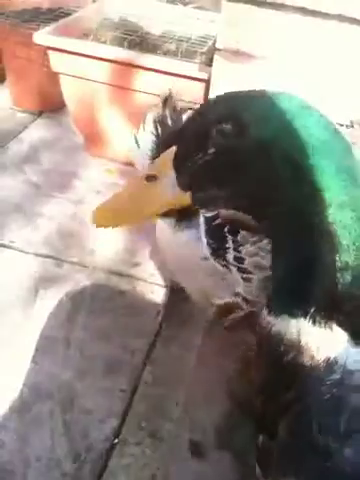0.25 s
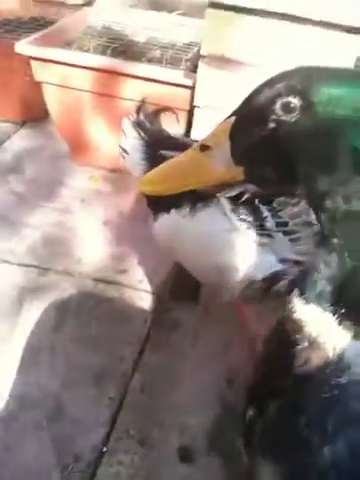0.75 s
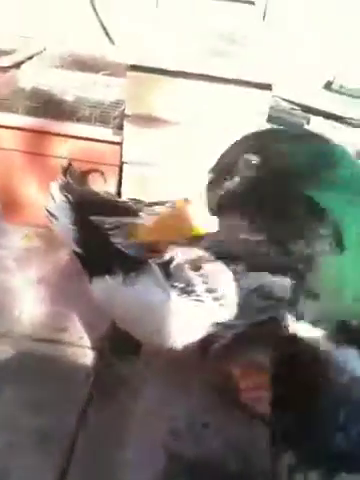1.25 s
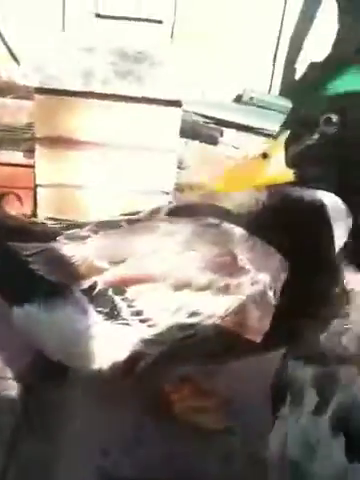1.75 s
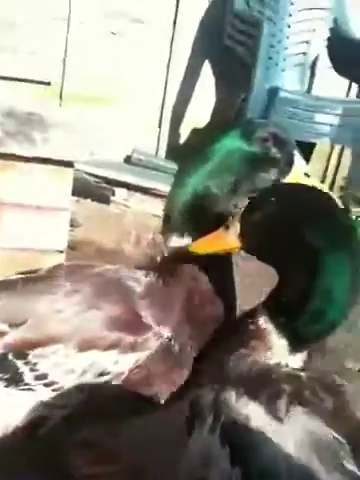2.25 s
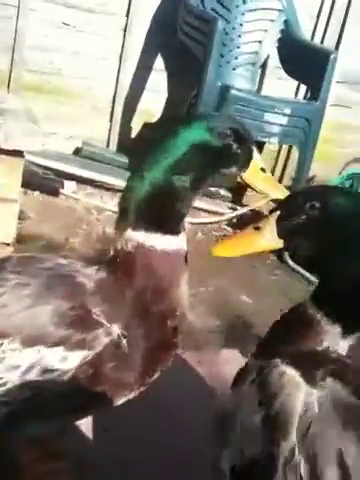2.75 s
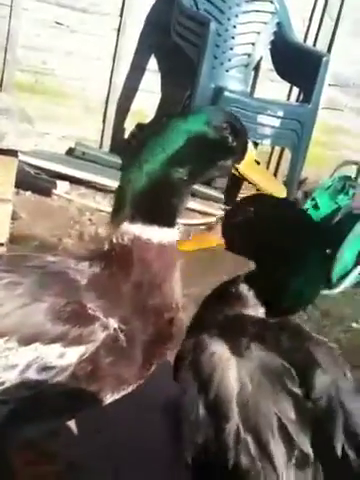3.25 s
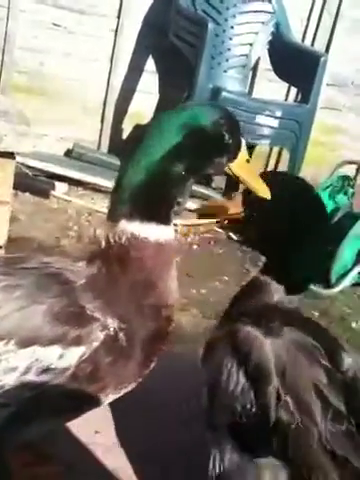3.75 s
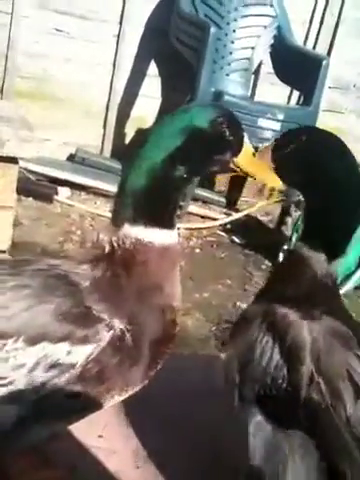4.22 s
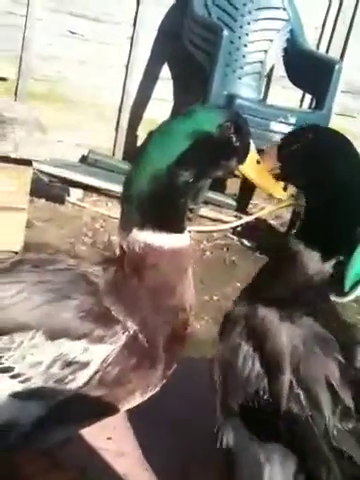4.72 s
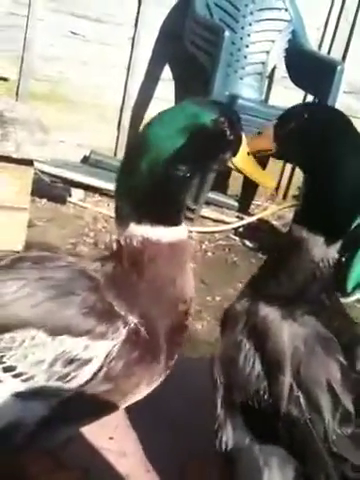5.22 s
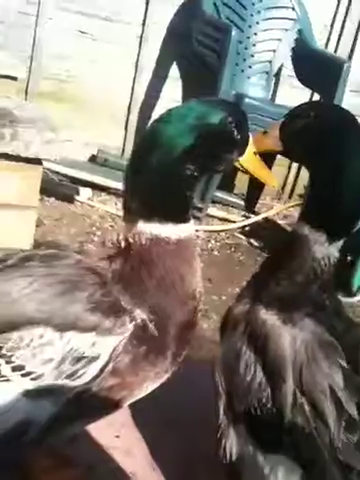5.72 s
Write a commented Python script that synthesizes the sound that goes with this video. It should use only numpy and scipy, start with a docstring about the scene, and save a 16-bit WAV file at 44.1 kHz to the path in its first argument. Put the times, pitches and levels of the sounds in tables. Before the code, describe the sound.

In a small walled yard, drakes chatter right beside the microphone for six seconds. The calls start at once, about 0.1 s, and never stop: some thirty-four short quacks, each around a tenth of a second, spaced about 0.2 s apart with some overlapping pairs. Each starts with a hollow little cluck, then swells into a hoarse, fast-fluttering reedy buzz around 1.3 kHz; stronger ones add a whistle near 2 kHz and breathy hiss. Stronger whistling calls stand out near 0.1, 1.5, 2.0, 2.6, 4.8 and 5.0 s; duller, weaker ones sit between, as around 0.6 to 0.7 s. Soft feather brushing comes near 0.3 and 2.7 s, a small scrape at 1.1 s, and dull foot bumps from 0.8 to 1.5 and 2.8 to 3.4 s. Short dense echoes follow everything. Beneath lies a very quiet outdoor hush with a faint thin whine. The last quack is cut near the end.

```python
"""Over a quiet outdoor hush with a thin whine, drakes chatter close by in a small walled yard for six seconds.
Each short quack opens with a cluck of decaying tones, then swells and beats 60 to 90 times a second. A beat is a low
reedy note, roughened by noise, with a higher whistle and a hiss that grow under hard pressure; some quacks overlap.
Brushing feathers and feet (enveloped noise) and dull bumps (sinking sines) come between; the yard adds dense echoes."""
import sys
import numpy as np
from scipy import signal
from scipy.fft import rfft, irfft
from scipy.io import wavfile
from scipy.ndimage import uniform_filter1d

SR = 44100
rng = np.random.default_rng(int(sys.argv[2]) if len(sys.argv) > 2 else 0)


def transcribe(signal):
    """Save signal, clipped to [-1, 1], as a 16-bit WAV file at the path in sys.argv[1]."""
    frames = np.atleast_2d(signal).T
    limited = np.clip(frames, -1, 1)
    pcm = np.round(limited * 32767).astype(np.int16)
    wavfile.write(sys.argv[1], SR, pcm)


N = 263718  # samples in the scene


def amp(db):
    """Decibel law: 20 dB is a factor of ten in amplitude."""
    return 10 ** (np.asarray(db) / 20)


def evened(x):
    """Normalization by effective value: the rms becomes 1."""
    return x / np.sqrt(np.mean(x ** 2) + 1e-20)


def read(points, hz):
    """Interpolation of a spectrum table on a logarithmic frequency axis."""
    f, value = np.transpose(points)
    return np.interp(np.log(hz + 1), np.log(f + 1), value)


def add(mix, s, sound):
    """Superposition: adds a sound at time s, dropping what falls outside."""
    start = round(s * SR)
    sound = sound[max(-start, 0):]
    part = mix[max(start, 0):][:len(sound)]
    part += sound[:len(part)]


def play(source, rows):
    """Superposition of one sound for each row on the time line."""
    mix = np.zeros(N)
    for row in rows:
        add(mix, *source(*row))
    return mix


def band(x, hz, width):
    """Simple resonance: a second-order peak with a gain of 1 at its centre."""
    hz = min(hz, SR / 2 - 1000)
    return signal.lfilter(*signal.iirpeak(hz, hz / width, SR), x)


def through(x, modes):
    """Parallel resonances, each applied twice so that the valleys between them stay dark."""
    total = 0
    for hz, width, db in modes:
        wide = width * np.pi / 2  # the cascaded pair narrows again to about the given width
        total = total + amp(db) * band(band(x, hz, wide), hz, wide)
    return total


def wander(size, hz):
    """Low-passed random fluctuation of rms 1; its Gaussian spectrum falls to 1/e in amplitude at hz."""
    f = np.fft.rfftfreq(size, 1 / SR)
    return evened(irfft(rfft(rng.standard_normal(size)) * np.exp(-(f / hz) ** 2), size))


def floor():
    """Stationary noise shaped in spectrum, with drifting patches, plus the electronics' phase-unsteady whine."""
    # outdoor hush, relative spectral density: f/Hz, level/dB
    hush_spectrum = [(25, -28), (50, -22), (75, -4), (160, 4.5), (400, 0), (650, -7.5), (1350, -8),
                     (2200, -12.5), (2900, -16.5), (6500, -17.5), (8700, -16), (13000, -20.5),
                     (15700, -21.5)]
    # whine of the electronics: f/Hz, rms level/dB
    whine_lines = [(7485, -90), (14970, -93), (15030, -93)]
    hush_db = -68  # rms level
    hz, _, z = signal.stft(rng.standard_normal(N), SR, nperseg=2048)
    patches = uniform_filter1d(rng.standard_normal(z.shape), size=8, axis=0)  # smooth over frequency
    patches = evened(uniform_filter1d(patches, size=6, axis=1))  # and over time
    patchy_db = 2.6 / (1 + hz[:, None] / 6000)
    gain_db = read(hush_spectrum, hz)[:, None] + patchy_db * patches
    hush = signal.istft(z * amp(gain_db), SR, nperseg=2048)[1][:N]
    t = np.arange(N) / SR
    whine = np.zeros(N)
    for f, db in whine_lines:
        whine += amp(db) * np.sqrt(2) * np.sin(2 * np.pi * f * t + wander(N, 60))
    return amp(hush_db) * evened(hush) + whine


def yard(x, gap=0.0068):
    """Reverberation: dense echoes from paving, walls and pots, each band decaying at its own rate."""
    # decay of the yard to -60 dB: f/Hz, t60/s
    decay_times = [(300, 0.49), (1100, 0.19), (1700, 0.23), (2250, 0.16), (5000, 0.23), (10000, 0.34)]
    size = 32768
    echoes_per_s = 2500
    taps = rng.choice([-1., 1.], size) * (rng.random(size) < echoes_per_s / SR)
    hz, t, z = signal.stft(taps, SR, nperseg=256)
    decay = amp(-60 * t / read(decay_times, hz)[:, None])
    tail = signal.istft(z * decay, SR, nperseg=256)[1]
    tail *= 1 - np.exp(-(np.arange(len(tail)) / SR / gap) ** 2)  # echoes build up over gap seconds
    return signal.fftconvolve(x, tail / np.linalg.norm(tail))[:N]


def brush(s, length, db, hz):
    """Friction noise: random grains through one broad resonance under a half-sine envelope."""
    size = 16384
    grains = rng.standard_normal(size) * amp(4 * wander(size, 200))
    u = np.minimum(np.arange(size) / (SR * length), 1)
    swish = evened(through(grains, [(hz, hz * 0.5, 0)]))
    return s, amp(db) * swish * np.sin(np.pi * u)


def bump(s, db, hz, length):
    """Damped vibration: a dull low note that swells quickly and sinks in pitch as it dies."""
    u = np.arange(0, 3, 1 / (SR * length))  # time in units of length
    shape = (u / 0.35) ** 2 * np.exp(2 * (1 - u / 0.25))
    turns = hz * length * u * (1.03 - 0.041 * u)
    return s, amp(db) * shape * np.sin(2 * np.pi * turns)


def cluck(s, db, hz, snap_db):
    """Cavity resonance excited as the bill parts: a hollow decaying pop with a short noise snap on top."""
    t = np.arange(2048) / SR
    pop = np.sin(2 * np.pi * hz * t) * amp(-60 * t / 0.033)
    pop += 1.23 * np.sin(2 * np.pi * hz * 0.713 * t) * amp(-60 * t / 0.0072)
    pop = signal.lfilter(*signal.butter(2, 260, "high", fs=SR), pop)  # a small mouth radiates no bass
    snap = band(rng.standard_normal(len(t)) * amp(-60 * t / 0.023), 2320, 1750)
    sound = pop / abs(pop).max() + amp(snap_db) * snap / abs(snap).max()
    return s, amp(db + 5.0) * signal.lfilter(*signal.butter(3, 4800, fs=SR), sound)


def quack(s, rate, swell, fade, reed_db, reed_hz, whistle_db, whistle_hz, hiss_db, tilt_db):
    """Source-filter principle: one push of air at s, chopped by the syrinx, excites throat and bill."""
    # resonances of the throat: f/Hz at a reed pitch of 1310 Hz, width/Hz, relative level/dB
    throat_modes = [(380, 120, -5), (826, 85, 4.5), (1159.5, 97, 7), (1358, 258, 9), (1709, 172, 9.5),
                    (2114, 267, 5.5), (2480, 57, -18)]
    # resonances of the bill: f/Hz, width/Hz, relative level/dB before the tilt
    bill_modes = [(3263, 148, 0.5), (3904, 190, -5.5), (4245, 210, -1.5), (4870, 305, -1.5),
                  (5095, 430, -3), (5800, 210, -28)]
    size = 8192
    t = (np.arange(size) - size // 2) / SR
    push_db = -8.5 * np.where(t < 0, np.abs(t / swell) ** 3.59, np.abs(t / fade) ** 2.0)
    push = amp(push_db)
    # the whistle needs pressure: it comes late and gives out early
    hard_push = amp(np.where(t < 0, -17 * (t / swell) ** 2, -26 * (t / fade) ** 2))
    # the beats slow down as the pressure drops
    slowing = np.where(t < 0, .08, .2) * (1 - push)
    turns = np.cumsum(rate * (1 - slowing)) / SR
    turns = turns - turns[size // 2] + .03 * wander(size, 40)
    uneven_db = 1.35 * wander(size, 84)

    def beats(lead, opening, leak):
        """Pulsed valve: snaps open lead cycles early, is widest after opening cycles, then closes slowly."""
        u = (turns + lead) % 1 / opening
        return amp(uneven_db) * (leak + u ** 2 * np.exp(2 * (1 - u)))

    def tone(hz, rough):
        """Phase integration: a membrane note, roughened in amplitude and phase by turbulent air."""
        angle = 2 * np.pi * np.cumsum(hz) / SR
        in_phase = np.sin(angle) * (1 + rough * wander(size, 830))
        return in_phase + rough * np.cos(angle) * wander(size, 720)

    def at_level(x, shape, db):
        """Energy scaling: gives x the rms of the envelope shape, times the gain db."""
        return amp(db) * evened(x) * np.sqrt(np.mean(shape ** 2))

    # the stronger the whistle, the earlier in each beat the reed note gives way to it
    breaking = 1 / (1 + amp(reed_db - whistle_db - 0.5))
    reed_beats = beats(0.26 + 0.3 * breaking, opening=.17, leak=.12)
    reed = tone(reed_hz * (1 + 0.1026 * wander(size, 234.5)), rough=0.53) * reed_beats
    rasp = 1.43 * rng.standard_normal(size) * reed_beats
    # the whistle's pitch arches with the pressure
    arch = whistle_hz * (.82 + .165 * push ** .5 + 0.0252 * wander(size, 174))
    chirp = 1 + 0.031 * np.sin(2 * np.pi * (turns + 0.14))  # each beat bends upward
    whistle_lead = 0.24  # cycles
    whistle = tone(arch * chirp, rough=.25)
    whistle *= beats(whistle_lead, opening=.18, leak=.04) * hard_push
    overtone = band(whistle ** 2, 2 * whistle_hz, 700)  # squaring doubles the frequency
    hiss = rng.standard_normal(size) * beats(whistle_lead, opening=.2, leak=.25)
    bill = [(hz, width, db + tilt_db * np.log2(hz / 4100)) for hz, width, db in bill_modes]
    # the throat resonances rise a little with the reed pitch
    throat = [(hz * (reed_hz / 1310) ** 0.25, width, db) for hz, width, db in throat_modes]
    voice = at_level(through((reed + rasp) * push, throat), push, reed_db)
    voice += at_level(through(whistle, throat), hard_push, whistle_db)
    voice += at_level(band(overtone, 2 * whistle_hz, 700), hard_push, whistle_db - 30)
    voice += at_level(through(hiss * (push + hard_push), bill), push, hiss_db)
    return s + t[0], amp(-3.0) * voice


def call(s, rise, fade, rate, cluck_db, reed_db, whistle_db, whistle_hz):
    """Nonlinear turbulence: a cluck, then a quack whose hiss grows faster than its voice."""
    # slow change of the voices: t/s, reed pitch f/Hz, hiss level/dB (at the reference voice level and
    # before the quack's common -3 dB), hiss tilt/(dB per octave)
    voice_changes = [(0, 1266, -69, -3), (0.499, 1198, -65.5, -2), (1.3, 1275, -61, 4),
                     (2.0, 1298, -68.5, 13), (2.7, 1298, -62, -9), (3.4, 1304, -64, -9),
                     (3.8, 1320, -58.5, -15), (4.3, 1344, -63.5, -9), (5.002, 1345, -63, -1),
                     (5.6, 1324, -58, -1), (6.0, 1322, -65, -5)]
    hiss_ref_db, hiss_growth = -39.5, 1.29  # reference voice level in dB; growth in dB per dB
    swell_share = .7  # swell time of the air as a part of the rise
    times, *curves = np.transpose(voice_changes)
    reed_hz, hiss_db, tilt_db = [np.interp(s, times, curve) for curve in curves]
    voice_db = 20 * np.log10(np.hypot(amp(reed_db), amp(whistle_db)))
    hiss_db = hiss_db + hiss_growth * (voice_db - hiss_ref_db)
    sound = np.zeros(SR // 2)
    add(sound, *cluck(0, cluck_db, hz=744, snap_db=-7))  # snap peak relative to pop peak
    add(sound, *quack(rise, rate, swell_share * rise, fade, reed_db, reed_hz,
                      whistle_db, whistle_hz, hiss_db, tilt_db))
    return s, sound


def scene():
    """Superposition of direct sound, reverberation and background: ducks, shuffling, yard and hush."""
    # feathers and feet brushing: t/s, length/s, level/dB (rms before the envelope), centre f/Hz
    brushes = [(0.309, 0.21, -68, 370), (.842, 0.19, -76, 8000), (1.132, 0.0073, -46, 1070),
               (1.132, 0.037, -66, 6600), (1.4, 0.027, -65, 5700), (2.561, .27, -75, 9000),
               (2.745, 0.16, -71, 507), (2.809, 0.015, -67, 3520), (4.422, 0.015, -66.5, 6400),
               (5.146, .29, -79, 8400)]
    # soft low bumps of feet: t/s, level/dB (before the swell shape), f/Hz (nominal), time scale/s
    bumps = [(.812, -53, 215, .087), (1.13, -46, 168, 0.018), (1.292, -46, 133, .028),
             (1.445, -50, 122, 0.016), (2.818, -46.5, 194, 0.038), (2.905, -50.5, 211, 0.033),
             (3.068, -42.5, 176, 0.049), (3.14, -57, 193, 0.13), (3.37, -52, 213, 0.039)]
    # one row a quack: cluck t/s, rise/s to the strongest push, fade/s, beat rate/Hz at the strongest push,
    # cluck level/dB (before +5 dB), reed level/dB and whistle level/dB (before -3 dB),
    # whistle f/Hz (nominal, before the arch)
    quacks = [ (.088, 0.028, 0.042, 76, -57, -40, -36, 1855),
              (.122, 0.032, 0.019, 90, -43.5, -52, -61, 1780),
              (.376, .058, 0.02, 64, -52.5, -45, -44.5, 1652),
              (.620, .045, 0.02, 84, -46.5, -45.5, -64, 1750),
              (.662, 0.044, 0.013, 80, -44, -48.5, -75, 1880),
              (.852, 0.053, 0.029, 75, -67, -40, -40.5, 1977),
              (1.016, 0.043, 0.022, 62, -44, -44.5, -50, 1714),
              (1.215, 0.042, 0.023, 64, -45, -41.5, -47.5, 1788),
              (1.406, .039, 0.028, 69, -42.5, -46.5, -36.5, 1945),
              (1.447, 0.046, 0.05, 78, -56, -39, -37, 2179),
              (1.806, 0.042, 0.027, 65, -48.5, -41, -43.5, 1850),
              (1.893, 0.045, 0.018, 72, -47, -46, -52.5, 2150),
              (2.037, 0.052, 0.038, 73.6, -63, -37.5, -34.5, 2048),
              (2.143, 0.047, 0.021, 82, -41.5, -44, -40, 1973),
              (2.383, 0.051, 0.014, 73, -48.5, -39.5, -45, 1863),
              (2.612, 0.041, 0.046, 80, -59, -38.5, -34, 2203),
              (2.9595, 0.038, 0.023, 61, -43, -45.5, -56, 1840),
              (2.9703, 0.055, 0.0091, 62, -39, -43.5, -60, 1640),
              (3.186, .030, 0.049, 91, -57, -37.5, -38, 2094),
              (3.220, 0.037, 0.024, 75.4, -43.5, -44.5, -45.5, 1900),
              (3.432, 0.053, .034, 82.5, -48, -44, -43.5, 2000),
              (3.637, 0.044, 0.017, 61, -49.5, -42, -60, 1880),
              (3.827, .073, 0.052, 86.8, -47, -41.5, -37, 2107),
              (4.070, .038, 0.062, 82.2, -46.5, -45.5, -43.5, 1860),
              (4.183, 0.038, 0.042, 69.6, -48, -43, -38, 2070),
              (4.428, 0.043, .029, 68, -46.5, -44, -53, 1670),
              (4.479, 0.039, 0.043, 71, -50.5, -41.5, -39.5, 2054),
              (4.728, .059, 0.0046, 64, -47, -45.5, -53, 1790),
              (4.803, .038, 0.034, 65.4, -46.5, -40.5, -35.5, 2070),
              (5.030, 0.045, .052, 85, -47.5, -38.5, -32.5, 2234),
              (5.275, 0.051, 0.042, 85, -47.5, -45.5, -45, 2000),
              (5.461, 0.051, 0.032, 68, -45, -44, -43, 1888),
              (5.676, 0.059, 0.039, 82, -64, -39, -37.5, 2136),
              (5.927, 0.052, 0.018, 72, -46.5, -45, -47.5, 1854)]
    ducks = play(call, quacks)
    shuffling = play(bump, bumps) + play(brush, brushes)
    echoes = amp(-9) * yard(ducks + shuffling)
    return (ducks + echoes + shuffling + floor())[None]


def record(dry):
    """Band limitation: a linear-phase low-pass filter removes the highest treble."""
    edge_hz = 15720
    lowpass = signal.firwin(511, edge_hz, window=("kaiser", 9), fs=SR)
    return signal.oaconvolve(dry, lowpass[None], "same")


dry = scene()
out = record(dry)
transcribe(out)
```